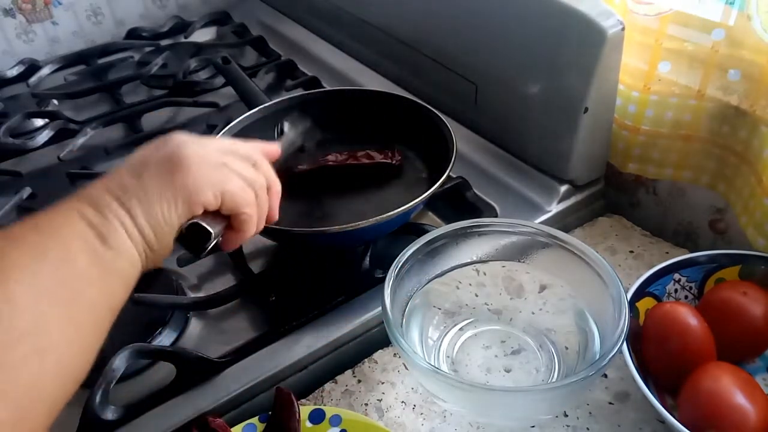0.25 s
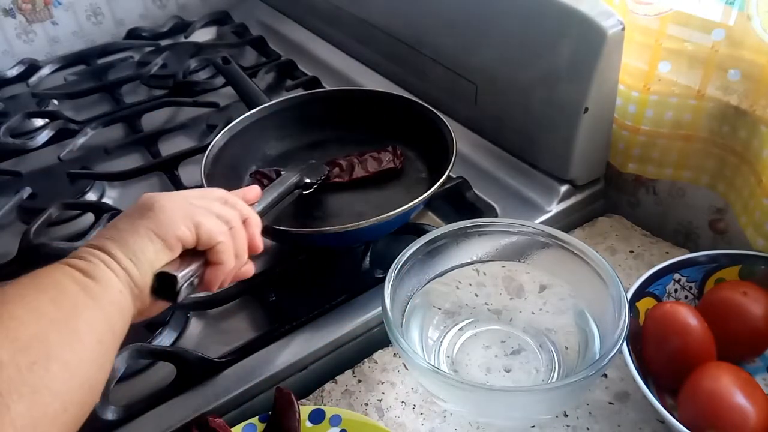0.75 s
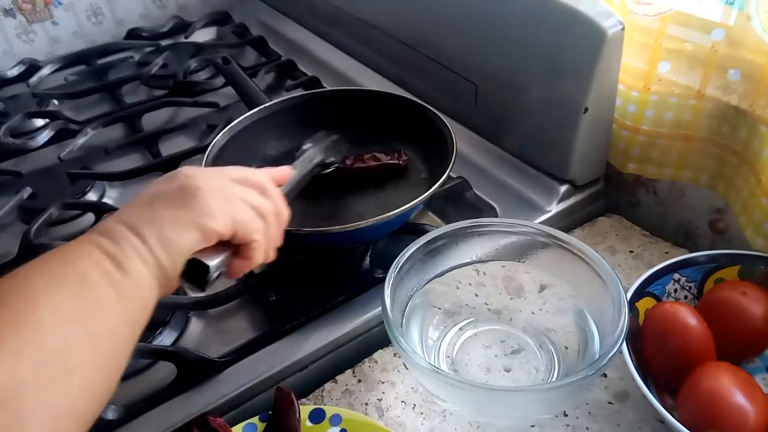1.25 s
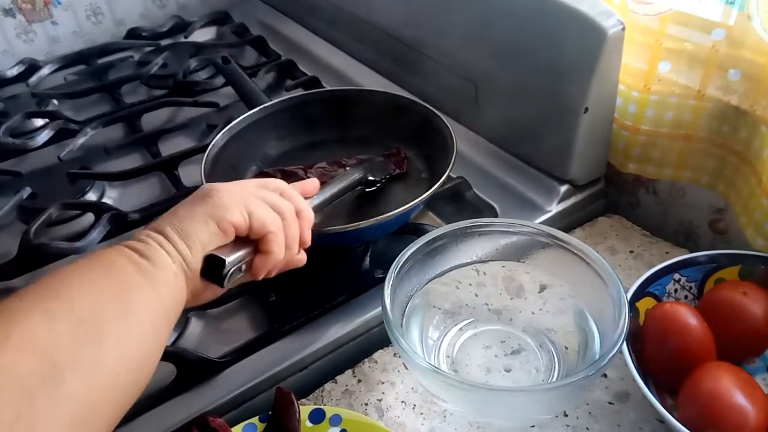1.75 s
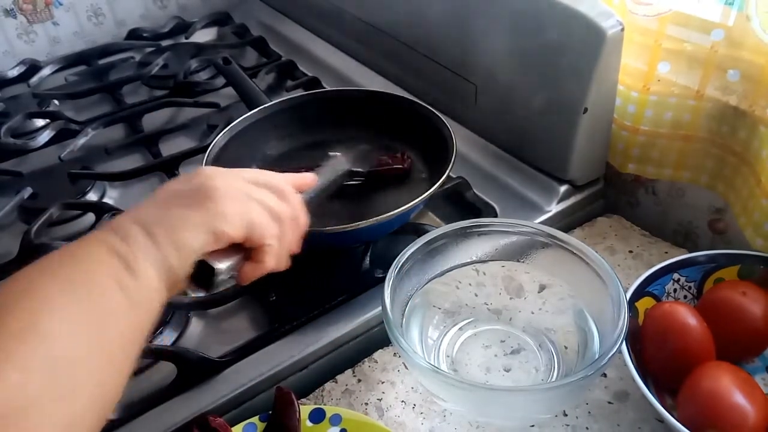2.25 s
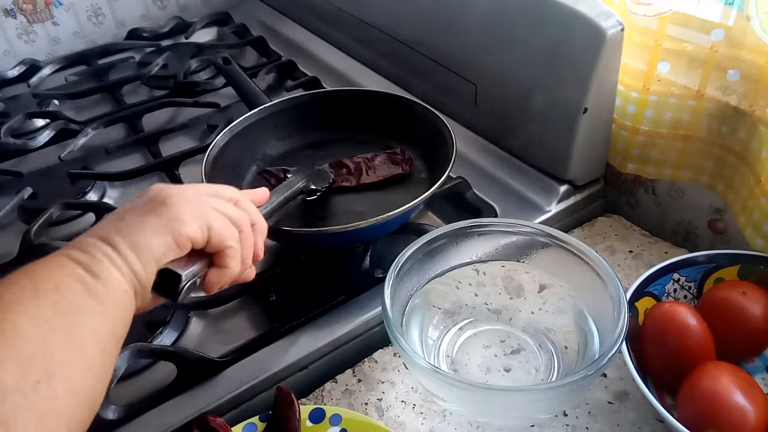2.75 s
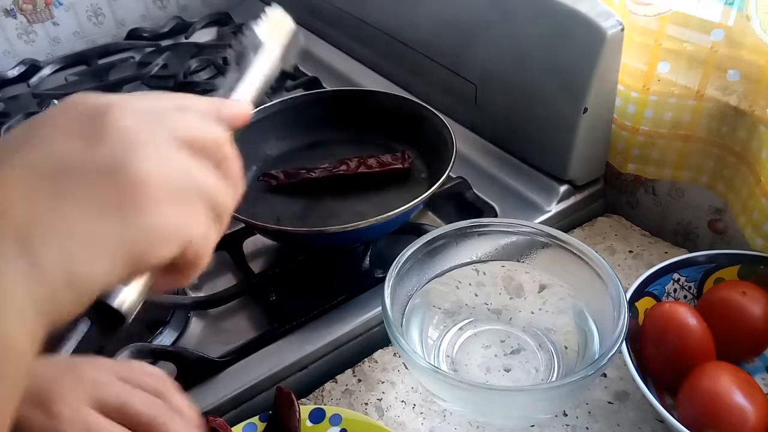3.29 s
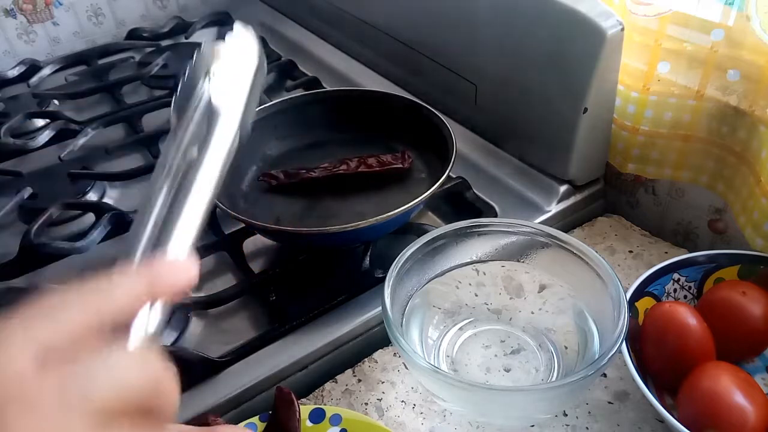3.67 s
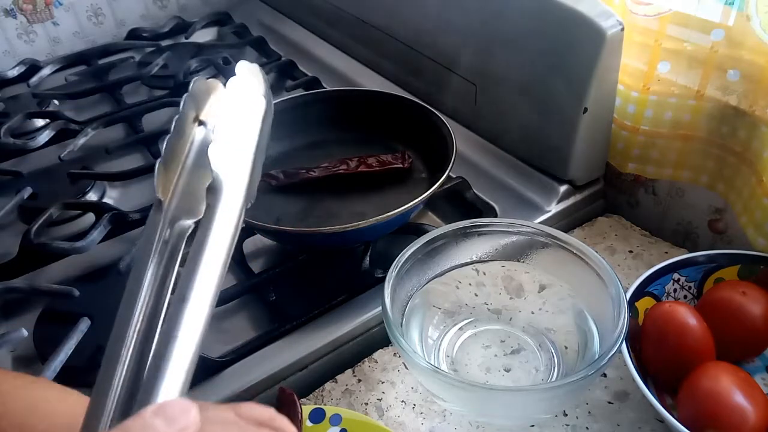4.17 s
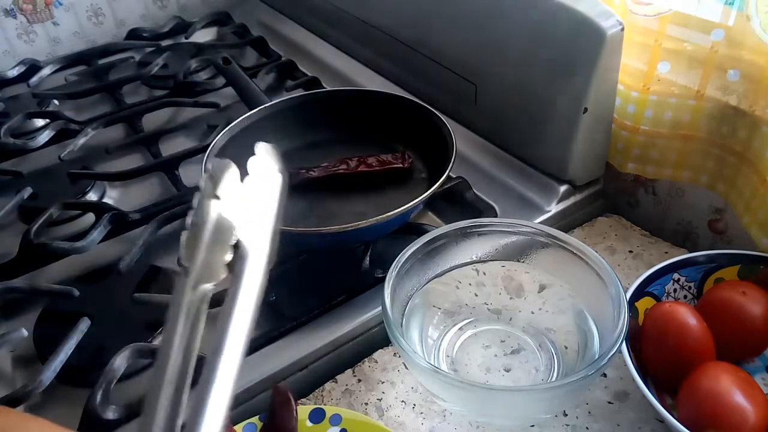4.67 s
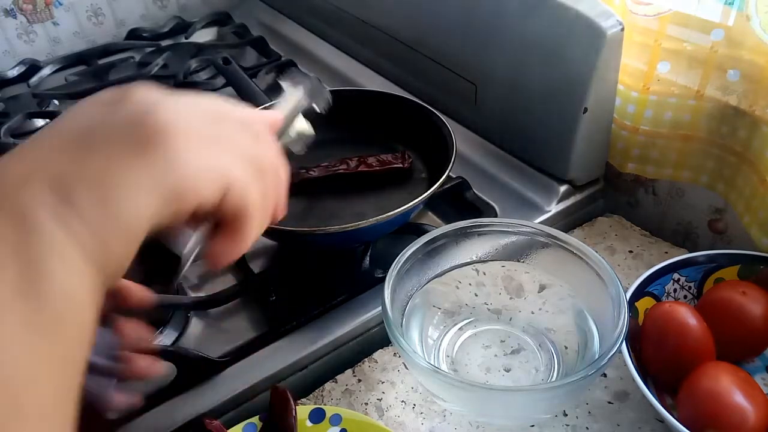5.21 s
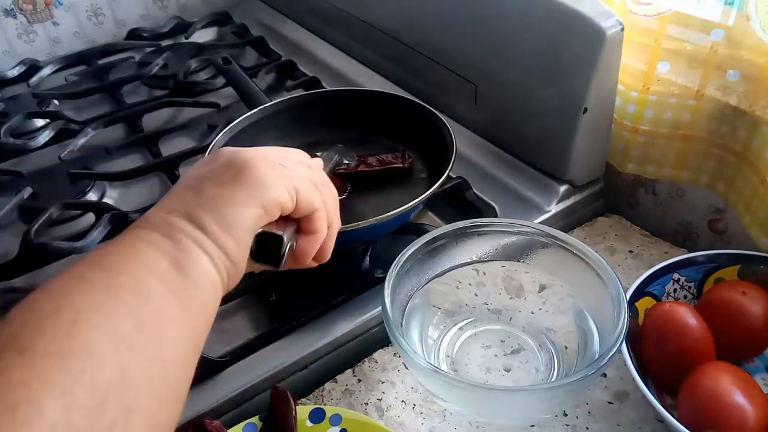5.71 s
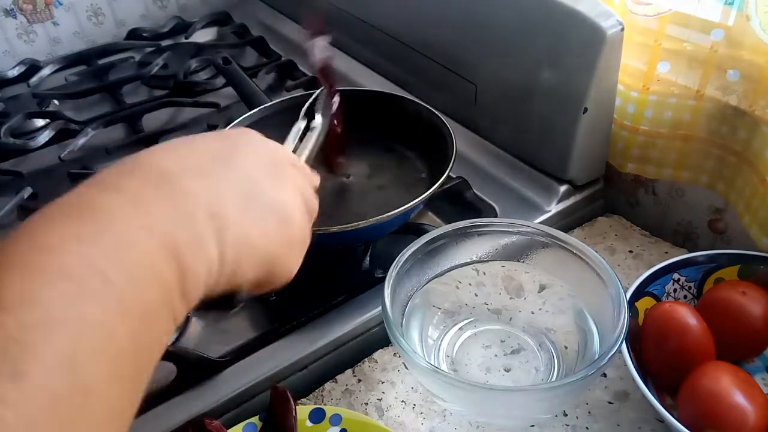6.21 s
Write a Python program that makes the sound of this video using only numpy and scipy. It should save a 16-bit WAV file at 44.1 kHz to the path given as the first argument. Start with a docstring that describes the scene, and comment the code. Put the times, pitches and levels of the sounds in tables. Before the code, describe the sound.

Metal tongs snap and rattle in bursts with quiet gaps, ending with a dull tap on a pan; soft hum and hiss underneath.

```python
"""Steel kitchen tongs work over a frying pan: the arms snap together, the tips tick and slide, the lock rattles
and taps ring the pan. Each contact is a pair of resonant clicks and a crack that set decaying modes ringing.
Slides are sparse random jerks through body resonances, and a thin high sine flickers, fades and sags in pitch.
A small hard kitchen, made of decaying noise, answers contacts and slides. A wavering low sine hums over
rumble and soft hiss, both of them shaped noise."""
import sys
import numpy as np
from scipy import signal
from scipy.fft import rfft, irfft, next_fast_len
from scipy.io import wavfile
from scipy.ndimage import uniform_filter1d, map_coordinates

SR = 44100
rng = np.random.default_rng(int(sys.argv[2]) if len(sys.argv) > 2 else 0)


def transcribe(signal):
    """Save signal, clipped to [-1, 1], as a 16-bit WAV file at the path in sys.argv[1]."""
    frames = np.atleast_2d(signal).T
    limited = np.clip(frames, -1, 1)
    pcm = np.round(limited * 32767).astype(np.int16)
    wavfile.write(sys.argv[1], SR, pcm)


N = 284425
RING = 2 * SR // 5  # samples kept of every ring and room tail
HALVES = np.array([[0.5], [-0.5]])  # shares a left-right difference between the two sides
# left-right correlation of diffuse sound: freq_hz, likeness (-1 to 1)
LIKENESS = [(60, 0.57), (180, 0.8), (550, 0.055), (1650, -0.17), (4970, 0.082), (15000, -0.3)]


def amp(db):
    """Decibels express an amplitude ratio on a logarithmic scale."""
    return 10 ** (np.asarray(db) / 20)


def unit(x):
    """Division by the root mean square gives a signal unit effective level."""
    return x / np.sqrt(np.mean(x ** 2) + 1e-20)


def along(points, hz):
    """Spectral properties are interpolated over log frequency from (freq_hz, value) points."""
    point_hz, value = np.transpose(points)
    return np.interp(np.log(hz + 1), np.log(point_hz + 1), value)


def curves(rows, outside=None):
    """Envelopes: linear interpolation in time gives one curve for each column after the time."""
    s, *columns = np.transpose(rows)
    t = np.arange(N) / SR
    return [np.interp(t, s, column, outside, outside) for column in columns]


def wobble(rate):
    """Slow random modulation: a spline through Gaussian knots, rate of them a second."""
    knots = rng.standard_normal(int(N * rate / SR) + 4)
    return map_coordinates(knots, [np.arange(N) * rate / SR])


def filtered(x, response):
    """Linear filtering: the spectrum is multiplied by a complex frequency response."""
    size = next_fast_len(x.shape[-1] + 8192)
    spectrum = rfft(x, size) * response(np.fft.rfftfreq(size, 1 / SR))
    return irfft(spectrum, size)[..., :x.shape[-1]]


def resonances(peaks):
    """Damped oscillators in parallel, of alternating sign, from rows of freq_hz, width_hz, level_db."""
    def response(f):
        return sum((-1) ** k * amp(db) * 1j * f * width / (hz * hz - f * f + 1j * f * width)
                   for k, (hz, width, db) in enumerate(peaks))
    return response


def tone(hz, db, lag):
    """Phase is the integral of frequency; db sets the rms level and the right side lags by lag radians."""
    phase = 2 * np.pi * np.cumsum(hz) / SR
    return np.sqrt(2) * amp(db) * np.sin(phase - np.array([[0], [lag]]))


def rush(spectrum, patchy_db):
    """Partly correlated stereo noise of unit rms, with random gain over patches of time and frequency."""
    z = signal.stft(rng.standard_normal((2, N)), nperseg=512)[2]
    field = uniform_filter1d(rng.standard_normal(z.shape[1:]), 6, 0)
    field = uniform_filter1d(field, 8, 1)
    pair = signal.istft(z * amp(patchy_db * unit(field)), nperseg=512)[1][:, :N]

    def mid_side(hz):
        # mid and side weights at this angle give the wanted correlation
        angle = np.arccos(np.clip(along(LIKENESS, hz), -1, 1)) / 2
        return amp(along(spectrum, hz)) * [np.cos(angle), np.sin(angle)]
    mid, side = filtered(pair, mid_side)
    return unit(np.array([mid + side, mid - side]))


def background():
    """Tonal and broadband noise add: a wavering hum, patchy rumble and smoother hiss."""
    # slow changes of level: time_s, hum_db, rumble_db
    swells = [(0.0, -48.5, -57), (0.05, -52.5, -54.5), (0.09, -50.5, -57), (0.36, -64, -54),
              (0.72, -52.5, -56.5), (0.79, -54.5, -49), (0.88, -56, -59), (1.2, -51, -53.5),
              (1.72, -60, -60.5), (1.78, -49, -52), (1.83, -52.5, -58.5), (2.23, -58, -59.5),
              (3.02, -50.5, -57.5), (3.29, -62.5, -62.5), (3.43, -81, -67), (3.66, -58.5, -54),
              (3.97, -54, -54), (4.49, -61.5, -62.5), (4.74, -52, -62.5), (4.8, -53.5, -63.5),
              (5.66, -57.5, -57.5), (5.69, -51, -67), (5.78, -50.5, -53), (5.91, -51.5, -55.5),
              (6.25, -63, -62), (6.45, -66, -65.5)]
    # relative spectral density of the rumble: freq_hz, level_db
    rumble_spectrum = [(15, -35), (25, -7.5), (42, -14), (55, -4), (72, 1), (90, -0.5), (120, -4.5),
                       (230, -14.5), (300, -37.5), (500, -91.5)]
    # relative spectral density of the hiss: freq_hz, level_db
    hiss_spectrum = [(120, -32), (200, -5), (350, -8.5), (500, -9), (710, -13.5), (1230, -17.5),
                     (1590, -20), (3200, -21.5), (6050, -25), (9000, -25), (15500, -24.5), (15700, -42.5)]
    hum_centre_hz, hiss_db = 58.8, -67.5
    hum_db, rumble_db = curves(swells)
    rumble = amp(rumble_db + 0.89 * wobble(14)) * rush(rumble_spectrum, patchy_db=1.5)
    hum = tone(hum_centre_hz + 1.8 * wobble(12), hum_db + 2.3 * wobble(15), lag=0.14)
    return hum + rumble + amp(hiss_db) * rush(hiss_spectrum, patchy_db=1.2)


def kitchen(x, delay):
    """Reverberation: convolution with fresh noise that decays by frequency and builds up over delay seconds."""
    # reverberation time of the small hard room: freq_hz, t60_s
    decay_times = [(200, 0.8), (1000, 0.33), (3000, 0.31), (7000, 0.26), (10000, 0.2), (15000, 0.15)]
    hz, t, (a, b) = signal.stft(rng.standard_normal((2, RING)), SR, nperseg=256)
    shared = np.clip(along(LIKENESS, hz), 0, 1)[:, None]
    z = np.array([a, shared * a + np.sqrt(1 - shared ** 2) * b])
    decay = amp(-60 * t / along(decay_times, hz)[:, None])
    tail = signal.istft(z * decay, SR, nperseg=256)[1][:, :RING]
    tail = tail * (1 - np.exp(-np.arange(tail.shape[1]) / SR / delay))
    tail = tail / np.linalg.norm(tail[0])
    return signal.fftconvolve(np.atleast_2d(x), tail, axes=1)[:, :x.shape[-1]]


def sing():
    """Frequency and amplitude modulation: a thin, fuzzy high mode flickers, fades and sags in pitch once."""
    start_s, end_s, start_db, fade_db_per_s = 0.12, 1.3, -71.5, 7
    pitch_hz, sag_start_s, sag_end_s, sag_hz_per_s = 4230, 0.92, 1.14, 1300
    t = np.arange(N) / SR
    db = start_db - fade_db_per_s * (t - start_s) - 4 * (t > sag_end_s)
    sagging = (t > sag_start_s) & (t < sag_end_s)  # the pitch returns afterwards
    sag_hz = sag_hz_per_s * (t - sag_start_s) * sagging
    fuzz_hz = 42 * wobble(260)
    flicker_db = 3.5 * wobble(90) + 1.5 * wobble(12)
    sounding = (t > start_s) & (t < end_s)
    return tone(pitch_hz - sag_hz + fuzz_hz, db + flicker_db, lag=1.0) * sounding


def slides():
    """Stick-slip friction: rough steel slips in tiny uneven jerks that excite the body of the tongs."""
    # strokes of steel on steel; envelope times, not always in order, and layer levels before the mix below:
    # start_s, full_s, second_full_s, end_s, body_db, bright_db, hollow_db
    strokes = [(0.238, 0.303, 0.28, 0.46, -55, -65, -49), (1.331, 1.43, 1.38, 1.9, -72.5, -71.5, -73.5),
               (1.8, 1.85, 2.03, 2.25, -84, -77, -74), (2.094, 2.126, 2.12, 2.2, -73, -81, -69.5),
               (2.31, 2.335, 2.345, 2.6, -64, -85, -75), (3.47, 3.473, 3.28, 3.61, -65.5, -52, -80),
               (3.641, 3.714, 3.95, 3.88, -75.5, -82.5, -65.5),
               (3.883, 3.953, 4.05, 4.13, -59.5, -76, -64.5), (4.093, 4.121, 4.2, 4.26, -82, -88, -63),
               (4.164, 4.175, 4.375, 4.47, -61.5, -67, -65.5), (4.489, 4.54, 4.68, 4.9, -71.5, -76.5, -80),
               (5.419, 5.46, 5.2, 5.6, -81, -74.5, -85), (5.612, 5.672, 5.9, 5.75, -83, -88, -70),
               (6.015, 6.06, 5.8, 6.22, -70.5, -73, -82), (6.296, 6.316, 6.9, 6.47, -71, -77, -78)]
    # body resonances of the tongs: freq_hz, width_hz, level_db
    body = [(1515, 120, -2), (2390, 57, 2.5), (3400, 150, -5.5), (3670, 21, -6), (3840, 220, -14)]
    # bright resonances: freq_hz, width_hz, level_db
    bright = [(4230, 57, 1), (5740, 8, -11), (5850, 560, 0.5), (7420, 110, -7.5)]
    # hollow low resonances: freq_hz, width_hz, level_db
    hollow = [(476, 77, 0.5), (950, 200, -1)]
    start_db, end_db = -14.5, -25.5  # stroke envelope, relative to its full strength
    out = np.zeros((2, N))
    for start, full, second_full, end, *layers_db in strokes:
        a, b = round(start * SR), min(N, round((end + 0.37) * SR))
        envelope = [(start, start_db), (full, 0), (second_full, 0), (end, end_db)]
        stroke_db = curves(envelope, outside=-120)[0][a:b]
        slips = rng.random((2, b - a)) < 0.06  # chance of a slip at each sample
        uneven_db = (3 * wobble(150) + 2.3 * wobble(35))[a:b]
        jerks = slips * rng.standard_normal((2, b - a)) * amp(uneven_db)
        rub = sum(amp(db) * unit(filtered(jerks, resonances(peaks)))
                  for peaks, db in zip((body, bright, hollow), layers_db))
        rub = amp(stroke_db) * rub
        direct = amp(-0.5) * rub * amp([[1.6], [-1.6]])  # louder on the left
        out[:, a:b] += direct + amp(-5.0) * kitchen(rub, delay=0.0029)
    return out


def bank(modes, rough):
    """Modal decay: complex tones die away while level and phase flutter, as close neighbours beat with them."""
    hz, db, t60 = np.transpose(modes)[:, :, None]
    t = np.arange(RING) / SR
    knots = rng.standard_normal((2, len(hz), 200))
    pace = np.clip(hz / 45, 30, 400)  # knots a second; neighbours crowd towards the treble
    level, phase = [np.array([np.interp(t * p, np.arange(200), row) for p, row in zip(pace, part)])
                    for part in knots]
    depth = rough * (hz / 3000) ** 0.17
    flutter = np.exp(depth * (0.65 * level + 1.6j * phase))
    grip_db = -300 * t ** 2  # hand and food damp the late ring ever faster
    decay = amp(db - 60 * t / t60 + grip_db)
    attack = 1 - np.exp(-t / 0.00047)
    return hz, flutter * decay * np.exp(2j * np.pi * hz * t) * attack


def ring(tones, spread_db):
    """Modal superposition: each blow draws new strengths, and higher modes differ more between the two sides."""
    hz, z = tones
    start = amp(spread_db * rng.standard_normal(len(hz))) * np.exp(2j * np.pi * rng.random(len(hz)))
    apart = np.clip(hz[:, 0] / 2200, 0, 1) * rng.standard_normal((2, len(hz)))
    sides = start * amp(1.3 * apart[::-1]) * np.exp(1.5j * apart)
    return (sides @ z).real


def click(burst, hz, width_share):
    """Resonant filtering: a burst through two equal resonances in series, scaled to unit peak."""
    peak = resonances([(hz, width_share * hz, 0)])
    x = filtered(burst, lambda f: peak(f) ** 2)
    return x / np.abs(x).max()


def contact_rows():
    """Impacts share one excitation model: all kinds become rows of the same columns, width share first."""
    # arms clash or grate together: start_s, level_db, left_right_db, click_hz, upper_hz, upper_db, crack_db,
    # contact_t60_s, arms_db, pan_db, room_db
    snap_table = [(-.008, -23.5, 5, 2920, 5380, 9, 16.5, 0.018, -2.5, -30, 0.5),
                  (2.336, -41, 3, 2350, 5600, -3.5, -4, 0.027, -40, -38.5, -7),
                  (2.3471, -25.5, 4, 2040, 6000, -12, 16.5, 0.027, -5.5, -36, -5.5),
                  (2.354, -19.5, 4.5, 3220, 5400, -2, 1.5, 0.0087, -19.5, -30.5, -2),
                  (3.476, -50.5, 7, 1680, 3160, 4.5, -12.5, 0.11, -50, -48.5, 3)]
    # a tip meets the pan, hard and short or soft and dragging: start_s, level_db, left_right_db, click_hz,
    # upper_hz, upper_db, crack_db, contact_t60_s, pan_db, room_db
    tap_table = [(5.738, -40, 4, 626, 2415, -18, -25, 0.014, -13, 0.5),
                 (5.7415, -27.5, 7, 806, 2395, -18, -33, 0.024, -9, -0.5),
                 (5.751, -33.5, 8, 825, 3975, -12, -24, 0.0069, -9.5, 5),
                 (6.065, -63.5, 6.5, 2630, 4010, 2, -17, 0.16, -29, 0),
                 (6.091, -63.5, 11, 1645, 2590, -16.5, -34, 0.25, -7.5, -7),
                 (6.316, -60, 9.5, 2110, 4700, -10, -3.5, 0.085, -9, 2),
                 (6.347, -66.5, 24, 1640, 3070, -6, -38, 0.14, -8.5, -5),
                 (6.425, -51, 11, 613, 4850, 7.5, -24, 0.014, -8, 0.02)]
    # small contacts of tips, hinge and ring: start_s, level_db, click_hz, upper_hz, upper_db, crack_db,
    # lock_db, room_db
    tick_table = [(0.2377, -38.5, 2280, 3160, 2, -4, -29, 2),
                  (0.2447, -28.5, 2350, 6170, -10.5, -11, -22, -3.5),
                  (0.262, -38, 750, 1500, -9, -30, -30, -2),
                  (0.2709, -44.5, 2160, 4540, 2.5, -15.5, -27, 3.5),
                  (0.3002, -34.5, 2640, 3730, 0, -5, -23, -1.5),
                  (0.9126, -53.5, 3168, 4190, -13, -17, -30, -2.5),
                  (1.0299, -52.5, 2300, 5900, -8, -5, -20, 2.5),
                  (1.3457, -45.5, 2320, 5013, -19, -18, -31, 4), (1.378, -51, 2280, 3640, -7, -19, -21, 0),
                  (1.388, -48.5, 2440, 5840, -2, -4, -28, -0.5),
                  (1.4395, -40.5, 2400, 3700, -21, -18, -33, -5),
                  (1.4586, -41.5, 2420, 4000, -7, -6, -22.5, 2),
                  (1.942, -63.5, 3270, 4340, 6, -11, -14, -2), (2.1253, -35, 2260, 3240, 0, -14, -31, -4),
                  (2.2769, -59, 2350, 5206, -20, -15, -22, 7.5),
                  (2.8703, -61.5, 2330, 3860, -15, -7, -21, -3.5),
                  (3.7062, -56, 2590, 3760, -13, -25, -17, 6),
                  (3.7377, -52, 2380, 5410, -14, -11, -24.5, 1),
                  (3.8046, -58.5, 2280, 3610, -19, -15, -17, 3),
                  (3.824, -50, 2350, 4670, -14, -13.5, -31, -4),
                  (3.8488, -42.5, 2650, 5960, -3, -8, -22, -6.5),
                  (3.932, -37.5, 2600, 1680, -8, -13, -42, -1),
                  (3.968, -33, 2650, 6900, 3.5, -38.5, -31, 1),
                  (3.9828, -31, 2620, 5330, 0, -3, -10.5, -8.5),
                  (4.038, -39.5, 2820, 4100, -2, -2.5, -38, -8),
                  (4.1868, -49.5, 2450, 3920, 1.5, -12, -11.5, 2.5),
                  (4.2295, -44, 2300, 4580, -9, -39, -26, 2), (4.268, -53.5, 2400, 3800, 0, -14, -17, 1.5),
                  (4.3143, -43, 2260, 3550, -8, -22, -26, -0.5),
                  (4.338, -43.5, 2290, 4930, -7, -12, -23, -1.5),
                  (4.536, -51.5, 3000, 3680, -10, -17, -20, 6),
                  (4.572, -48, 3420, 3610, -26, -20, -18.5, 4),
                  (4.6698, -46.5, 2370, 3650, -28, -17, -32, 0.5),
                  (5.3961, -55, 3613, 4470, -12, -14, -23, -3)]
    snap_lock_db = -35
    tap_narrow = 0.56  # the pan's clicks are narrower than those of the tongs
    tap_arms_db, tap_lock_db = -46, -33  # the gripped tongs barely ring on a tap
    tick_lr_db, tick_t60_s, tick_arms_db, tick_pan_db = 5.5, 0.0088, -41, -31
    snaps = [(1, *row[:-2], snap_lock_db, *row[-2:]) for row in snap_table]
    taps = [(tap_narrow, *row[:-2], tap_arms_db, tap_lock_db, *row[-2:]) for row in tap_table]
    ticks = [(1, s, db, tick_lr_db, *clicks, tick_t60_s, tick_arms_db, lock_db, tick_pan_db, room_db)
             for s, db, *clicks, lock_db, room_db in tick_table]
    return snaps + taps + ticks


def contacts():
    """Impact excitation: two clicks and a crack set arms, lock and pan ringing, and a room answer is added."""
    # modes of the steel arms, before grip damping: freq_hz, level_db, t60_s
    arm_modes = [(471, -27, 0.79), (1773, -15.5, 0.11), (2513, -13.5, 0.24), (2610, -12, 0.2),
                 (3590, -16.5, 0.24), (4377, -15, 0.2), (4735, -1, 0.16), (5080, -10.5, 0.099),
                 (5160, -5, 0.16), (5640, -6, 0.16), (5440, -5.5, 0.08), (5390, -9, 0.11),
                 (5830, -9.5, 0.18), (6700, -14, 0.13), (6640, -17, 0.32), (7740, -15, 0.32),
                 (8340, -16.5, 0.24), (8700, -8.5, 0.22), (8830, -17, 0.18), (9870, -10.5, 0.15),
                 (10450, -14, 0.2), (10190, -15.5, .12), (11100, -10, 0.23), (11660, -18, 0.19),
                 (13020, -11, 0.15), (13100, -12.5, .1), (14800, -11, 0.16)]
    # modes of the sliding lock at the hinge, before grip damping: freq_hz, level_db, t60_s
    lock_modes = [(917, -17.5, 0.46), (1780, -11.5, 0.31), (2360, -4.5, 0.3), (2880, -4.5, 0.22),
                  (3990, -3.5, 0.22), (4390, -17, 0.2), (5380, -14.5, 0.35), (5330, -4.5, 0.092),
                  (5650, -9.5, 0.26), (5740, -12, 0.25), (6600, -9, 0.24), (7827, -16.5, 0.077)]
    # modes of the frying pan, before grip damping: freq_hz, level_db, t60_s
    pan_modes = [(210.8, -3.5, 0.2), (289, -7.5, 0.15), (338, -11, .2), (398.3, -3.5, 0.21),
                 (444.5, -5, 0.28), (537, -13.5, .35), (585, -12.5, 0.35), (716, -12, 0.1),
                 (782, -8.5, 0.11), (836, -6, 0.25), (861, -17, 0.38), (953, -14.5, 0.37),
                 (1408, -8.5, 0.21), (1546, -19, 0.77), (1647, -7, 0.76), (1662, -3.5, 0.37),
                 (1946, -21.5, 0.57), (2190, -4.5, 0.33), (2470, -15, 0.23), (2601, -11.5, 0.23),
                 (2660, -11, 0.22), (3275, -22, 0.071), (3660, -18.5, .11), (4080, -25.5, 0.16),
                 (4210, -25.5, 0.44), (5270, -18, 0.15), (5900, -30.5, .4), (6700, -28.5, .25)]
    # the left port faces aside: freq_hz, left_right_db
    port_aim = [(300, -8), (1500, -4), (6000, 3), (9000, -5), (15000, -7.5)]
    right_lag = 20  # samples by which a contact's clicks and crack reach the right port later
    out, t = np.zeros((2, N + 2 * RING)), np.arange(RING) / SR
    bodies = bank(arm_modes, rough=0.97), bank(lock_modes, rough=0.4), bank(pan_modes, rough=0.53)

    def thin(f):
        # thin steel radiates little bass
        return (1j * f / 1300) ** 3 / (1 + 1j * f / 1300) ** 3

    for narrow, s, db, lr_db, low_hz, high_hz, high_db, crack_db, t60, *rings_db, room_db in contact_rows():
        burst = amp(-60 * t / t60) * (1 - np.exp(-t / 0.0018)) * rng.standard_normal(RING)
        # a harder blow wakes more neighbouring modes: a wider click
        spread = narrow * np.clip(0.67 + 0.0072 * db, 0.17, 0.6)
        hit = click(burst, low_hz, spread) + amp(high_db) * click(burst, high_hz, spread)
        hit = hit + amp(crack_db) * filtered(burst, thin)
        rings = sum(amp(ring_db) * ring(body, spread_db=2.3) for body, ring_db in zip(bodies, rings_db))
        direct = np.array([hit, np.roll(hit, right_lag)]) + rings
        # the room is fed the clicks, the crack and the left channel of the summed rings
        room_feed = hit + amp(-3.5) * rings[0]
        pair = direct + amp(room_db) * kitchen(room_feed, delay=0.0016)
        at = RING + round(s * SR)  # the margin lets a contact begin before time zero
        out[:, at:at + RING] += (amp(db + HALVES * lr_db) * pair)[:, :out.shape[1] - at]
    return filtered(out[:, RING:RING + N], lambda hz: amp(along(port_aim, hz) * HALVES))


def scene():
    """Superposition: the pressures of all sources add."""
    return contacts() + slides() + sing() + background()


def record(dry):
    """Band limiting: the microphone loses the upper treble but for a small peak, and all above the limit."""
    # frequency response of the microphone: freq_hz, level_db
    mic_response = [(20, 0), (6200, 0.5), (7200, -4.5), (8300, -10.5), (13200, -11), (14300, -6),
                    (15450, -1), (15750, -15.5), (16700, -20)]
    band_limit_hz = 16800
    return filtered(dry, lambda hz: amp(along(mic_response, hz)) * (hz < band_limit_hz))


dry = scene()
out = record(dry)
transcribe(out)
```